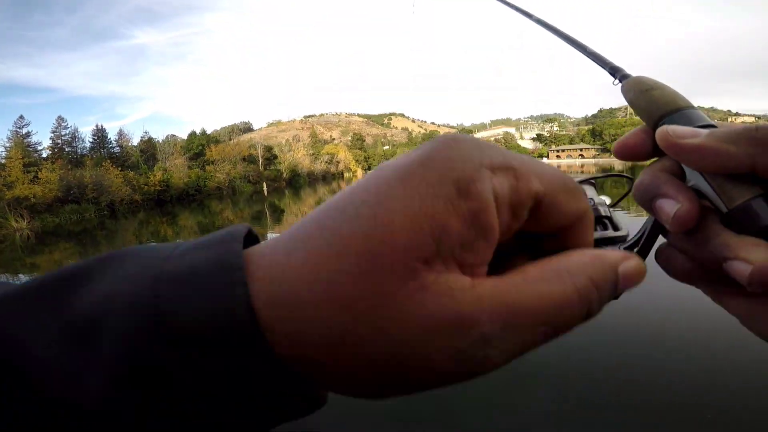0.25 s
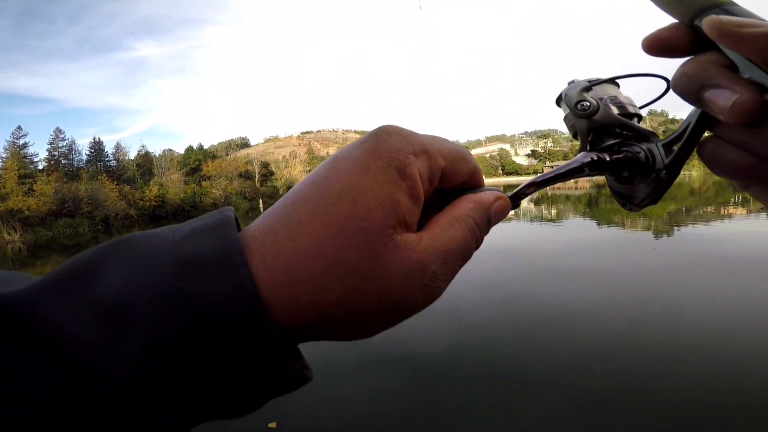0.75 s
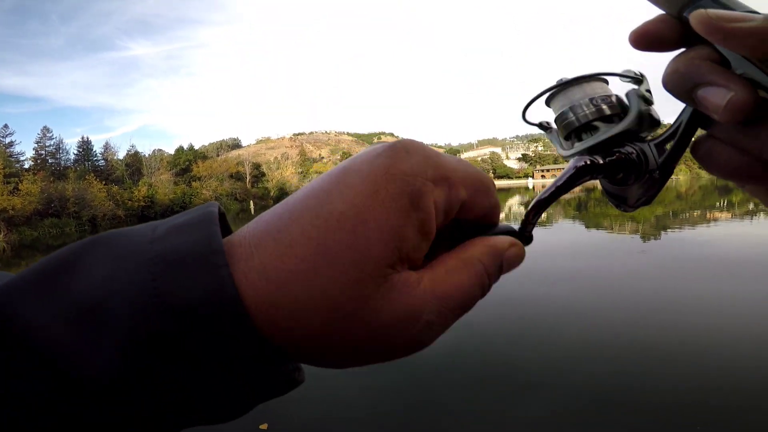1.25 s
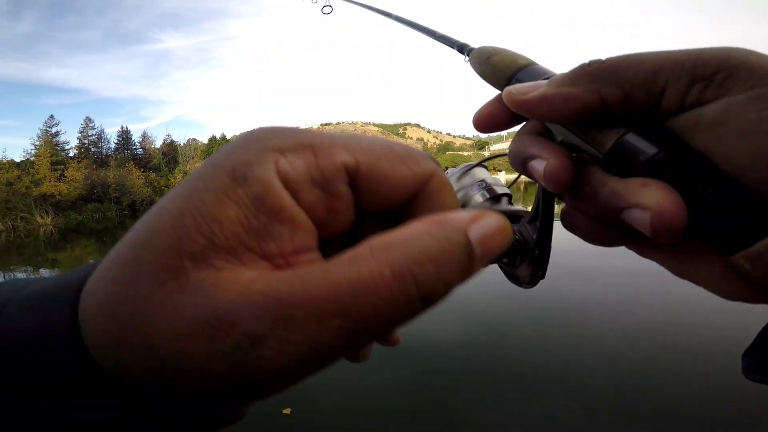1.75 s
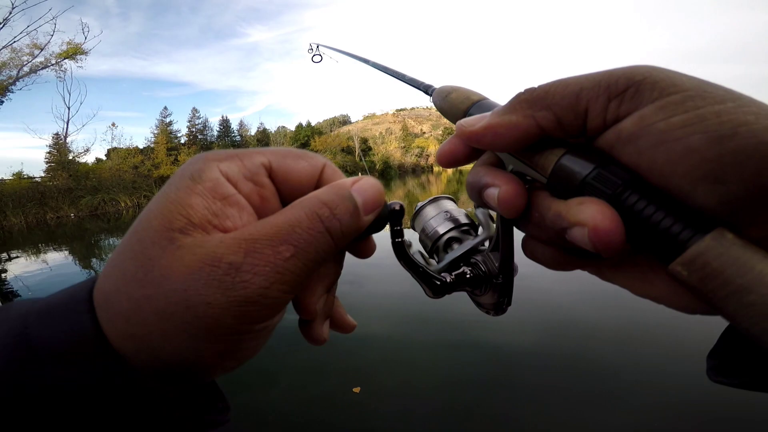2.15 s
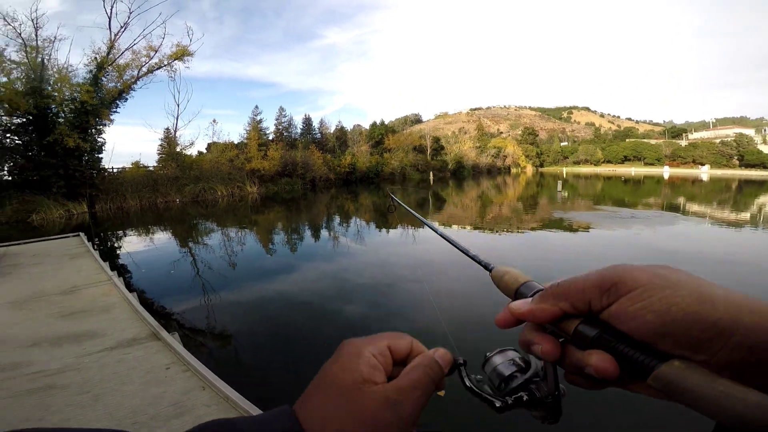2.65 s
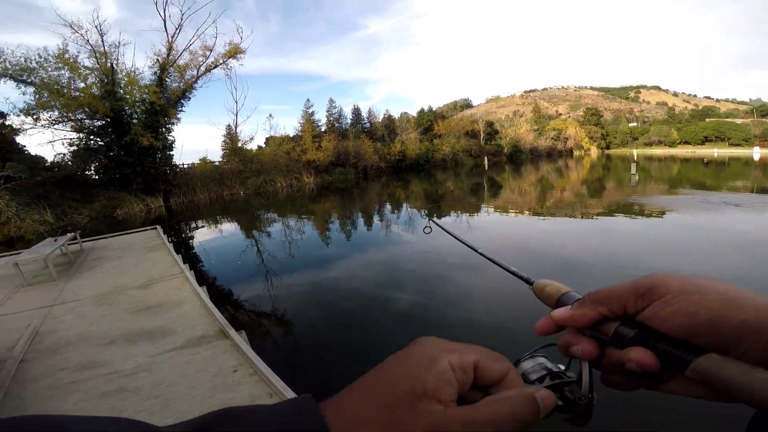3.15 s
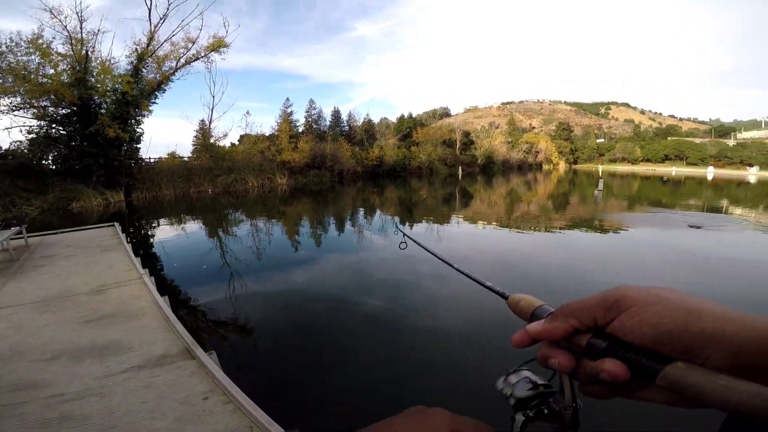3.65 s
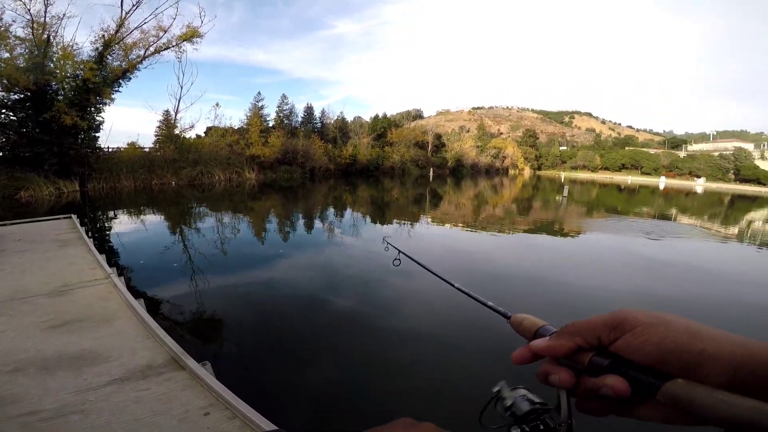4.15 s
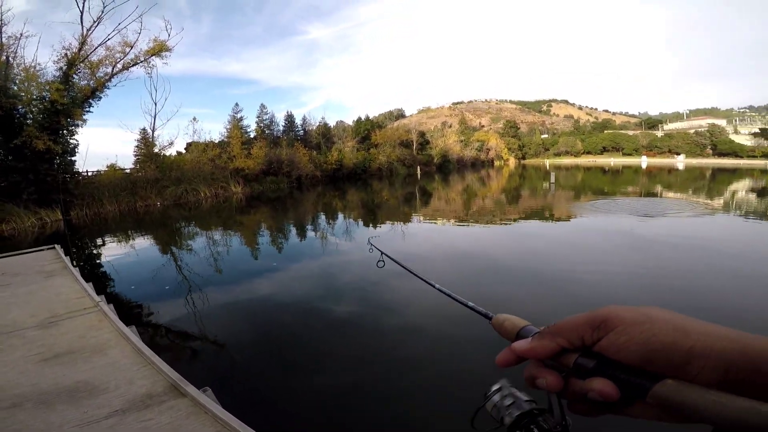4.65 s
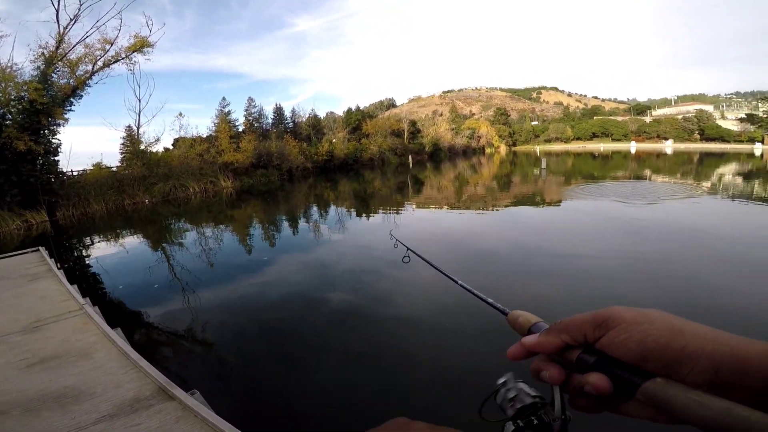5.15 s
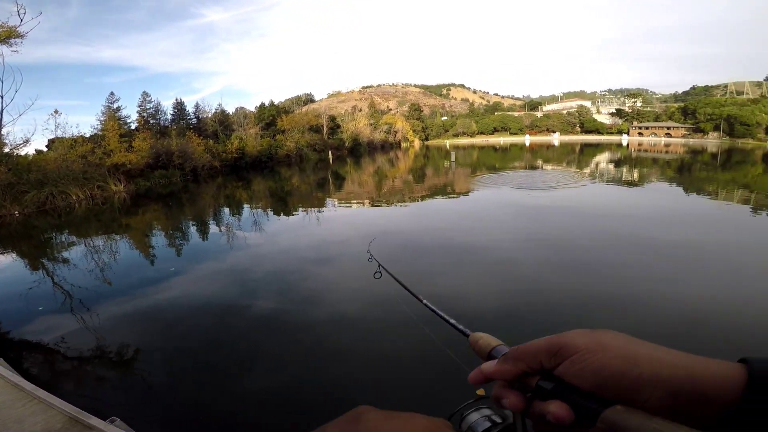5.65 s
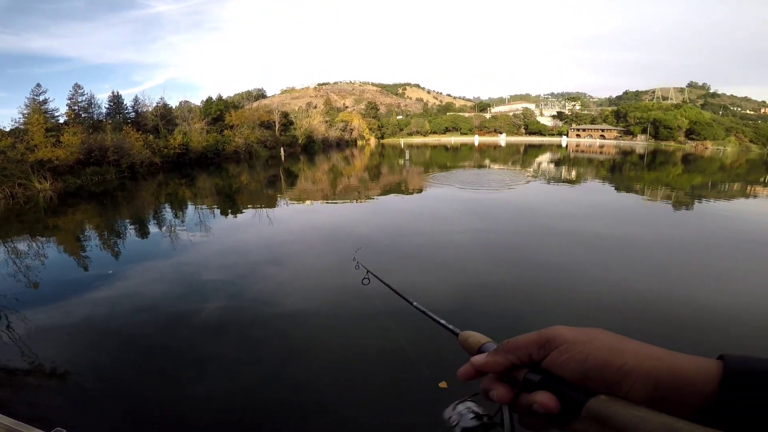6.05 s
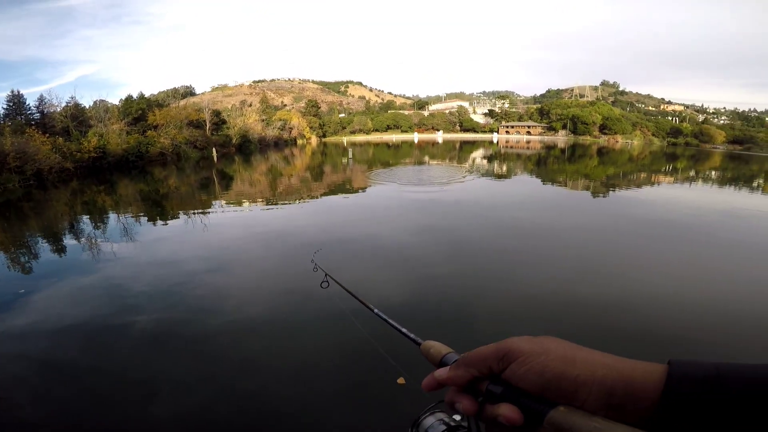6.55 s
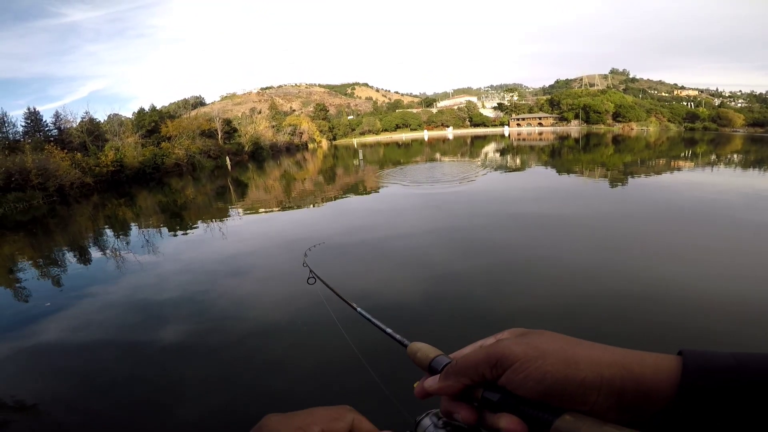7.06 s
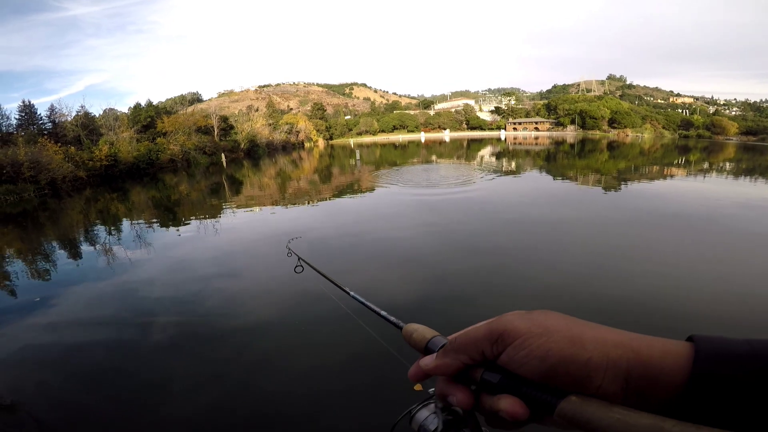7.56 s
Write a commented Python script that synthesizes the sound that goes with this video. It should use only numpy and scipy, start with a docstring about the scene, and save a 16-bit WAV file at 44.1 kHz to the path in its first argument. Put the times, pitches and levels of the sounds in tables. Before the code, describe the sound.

A deep, steady rumble of distant traffic fills the open lakeside throughout, with low engine drones slowly rising inside it. Close by, a fishing reel whirrs thinly and grittily under the hand. A light snap comes at 0.1 s and a tick near 0.5; cranking eases around 1 s, then sharp metallic ticks, brief line scrapes and cloth rubs crowd 1.15 to 1.95, with a dull knock at 1.85. Soft bumps follow at 2.35 and 2.6. From 3.0 to 3.25 knocks, snaps and rustles bunch together, then a fuller sleeve swish at 3.5. A tap comes at 3.8, muffled bumps around 4.5 and a tick at 4.9. Small swishes continue; the line scrapes at 6.45 and a thud with a snap lands at 6.8. One engine falls in pitch after 5.7 while another deep note climbs, swelling near 6.85 before fading. A very faint electronic whine lies underneath.

```python
"""A low rumble of road traffic comes across a still lake while, close by, a fishing reel whirrs and ticks.
A jacket sleeve swishes, the tackle knocks softly and three engines drone out of the far tyre roar.
Rubbing sounds are coloured noise that swells and flutters, knocks are short dying tones, and snaps and
ticks are clicks that ring a few pitches. Engines are stacks of sine waves. A body-worn stereo camera
hears it all: it presses down loud bass, adds a faint whine and cuts the very top."""
import sys
import numpy as np
from scipy import signal
from scipy.fft import rfft, irfft
from scipy.io import wavfile
from scipy.ndimage import uniform_filter1d

SR = 44100
rng = np.random.default_rng(int(sys.argv[2]) if len(sys.argv) > 2 else 0)


def unload_audio(sound):
    """Save the sound as a 16-bit wav file, at the path given as the first command line argument."""
    columns = np.transpose(np.atleast_2d(sound))
    # keep every value between -1 and 1, then stretch to whole-number steps
    steps = np.round(np.clip(columns, -1, 1) * 32767)
    wavfile.write(sys.argv[1], SR, steps.astype(np.int16))


N = 343980
TIME = np.arange(N) / SR
FREQS = np.maximum(np.fft.rfftfreq(N, 1 / SR), 1)


def from_db(db):
    """Turn decibels into a plain multiplier."""
    return 10 ** (np.asarray(db) / 20)


def rms_one(x):
    """Scale a signal to an average power of one."""
    return x / np.sqrt(np.mean(x ** 2) + 1e-20)


def in_time(rows):
    """Draw straight lines between the rows of a time table, giving each column at every sample."""
    s, *columns = np.transpose(rows)
    return [np.interp(TIME, s, c) for c in columns]


def in_frequency(rows):
    """Draw lines between the rows of a pitch table, giving each column at every frequency."""
    hz, *columns = np.transpose(rows)
    return [np.interp(np.log(FREQS), np.log(hz), c) for c in columns]


def drift(rate_hz):
    """Random wandering with a spread of 1 and about this many turns a second."""
    white = rfft(rng.standard_normal(N))
    return rms_one(irfft(white / (1 + (FREQS / rate_hz) ** 2), N))


def noise(spectrum):
    """Two unrelated noises of one colour and unit power, falling away steeply outside its range."""
    low_skirt = 1 / (1 + (spectrum[0][0] / FREQS) ** 4)
    high_skirt = 1 / (1 + (FREQS / spectrum[-1][0]) ** 8)
    colour = from_db(in_frequency(spectrum)[0]) * low_skirt * high_skirt
    white = rfft(rng.standard_normal((2, N)))
    return rms_one(irfft(white * colour, N))


def swells(strokes):
    """Add up the power of bell-shaped strokes, each at half its height at the ends of its length."""
    coarse = TIME[::SR // 1000]  # about a thousand points a second are enough
    power = 0
    for s, length, db in strokes:
        from_middle = 2 * (coarse - s) / length
        power = power + from_db(db) ** 2 * .5 ** (2 * from_middle ** 2)
    return np.interp(TIME, coarse, np.sqrt(power))


def stereo(pair, image):
    """Place a sound: row one is shared by both sides, row two is diffuse; the centre keeps its level."""
    balance_db, lead, alike = in_frequency(image)
    alike = np.clip(alike, 0, .995)
    shared, diffuse = rfft(pair) * np.sqrt([(1 + alike) / 2, (1 - alike) / 2])
    left = from_db(balance_db / 2) * np.exp(.5j * lead)
    centre = np.sqrt(abs(left) ** 2 + abs(left) ** -2 + 2 * alike * np.cos(lead)) / 2
    sides = np.array([(shared + diffuse) * left, (shared - diffuse) / left])
    return irfft(sides / centre, N)


def struck(events, modes, contact_s, soft_hz, focus_db, gritty):
    """Each contact, a click plus a gritty burst, rings modes that weaken by focus_db per octave off its pitch."""
    burst = np.exp(-TIME[:SR // 50] / contact_s)
    grains = rng.standard_normal((len(events), 2, len(burst)))
    contacts = gritty * grains * burst / np.linalg.norm(burst)
    contacts[:, 0, 0] += np.sqrt(1 - gritty ** 2)
    ringing = 0
    for k, (hz, mode_db, t60) in enumerate(modes):
        force = np.full((2, N), 1e-18)
        for (s, strength_db, favoured_hz), contact in zip(events, contacts):
            start = round(s * SR)
            db = strength_db - focus_db * abs(np.log2(hz / favoured_hz))
            force[:, start:start + len(burst)] += from_db(db) * contact
        decay = from_db(-60 / (t60 * SR))
        w = 2 * np.pi * hz / SR
        top = [0, from_db(mode_db) * np.sin(w)]
        bottom = [1, -2 * decay * np.cos(w), decay * decay]
        ringing = ringing + (-1) ** k * signal.lfilter(top, bottom, force)  # modes alternate in sign
    return signal.sosfilt(signal.butter(2, soft_hz, fs=SR, output="sos"), ringing)


# how hard the reel is cranked, before trims: start_s, treble_db, upper_middle_db
CRANKING = [(0.0, -57, -59.5), (0.47, -56, -60.5), (0.54, -60.5, -63), (0.85, -60.5, -66), (1.14, -61, -64),
            (1.18, -60, -58), (1.3, -58, -60), (1.42, -55.5, -57), (1.85, -57.5, -56), (2.2, -58.5, -58),
            (2.71, -58.5, -60.5), (3.71, -58, -60), (4.04, -59, -62), (5.56, -59, -62),
            (5.95, -57.5, -59.5), (6.12, -59, -62.5), (7.8, -59.5, -60)]
# colour of the gears' whirr: pitch_hz, relative level_db (per Hz)
WHIRR_COLOUR = [(2000, -31.5), (4000, -8), (5000, -8), (6200, -3), (7600, -4), (9500, -8.5), (11500, -14),
                (13000, -13.5), (14500, -36)]
# colour of the rotor's rasp: pitch_hz, relative level_db (per Hz)
RASP_COLOUR = [(500, -11), (1200, 5.5), (1900, 2), (2800, -0.5), (3800, -4.5), (5000, -11.5), (8000, -34)]
# where the gears and the line sit: pitch_hz, left_minus_right_db, left_lead_radians, alike_0_to_1
AHEAD_IMAGE = [(1000, 0, 1.7, 0.57), (1980, 0.87, 1.86, 0.33), (3600, -.5, 0.67, 1), (5000, 0, 0.53, 0.2),
               (8000, 0, 0.54, 0.083)]
WHIRR_TRIM_DB, RASP_TRIM_DB = -1.5, 4.5


def gears(grit_per_s=45, grit_db=27.0):
    """Fine rubbing in the reel flutters as the teeth mesh, with tiny clicks where they catch."""
    treble_db, middle_db = in_time(CRANKING)
    teeth = from_db(0.9 * drift(63))
    whirr = noise(WHIRR_COLOUR) * from_db(treble_db + WHIRR_TRIM_DB)
    rasp = noise(RASP_COLOUR) * from_db(middle_db + RASP_TRIM_DB)
    catches = rng.random(N) < grit_per_s / SR
    clicks = catches * rng.standard_normal((2, N)) * from_db(middle_db + grit_db)
    click_band = signal.butter(2, [1500, 4500], "band", fs=SR, output="sos")
    grit = signal.sosfilt(click_band, clicks + 1e-18)
    return stereo(teeth * (whirr + rasp) + grit, AHEAD_IMAGE)


# the loose parts at full effort: chances per second, middle level and its random spread
RATTLES_PER_S, RATTLE_DB, RATTLE_SPREAD_DB = 65, -45.5, 5


def rattles(low_hz=2200, high_hz=8500):
    """Loose parts touch by chance, more often and louder with harder cranking; lists them like the ticks."""
    middle_db = in_time(CRANKING)[1]
    effort_db = middle_db - middle_db.max()
    chance = RATTLES_PER_S * from_db(2 * effort_db) ** 2 / SR
    happens = rng.random(N) < chance
    db = RATTLE_DB + effort_db + RATTLE_SPREAD_DB * rng.standard_normal(N)
    hz = low_hz * (high_hz / low_hz) ** rng.random(N)
    moments = np.flatnonzero(happens[:-SR // 20])  # none in the last twentieth of a second
    return [(TIME[i], db[i], hz[i]) for i in moments]


# metal ticks of the reel: start_s, strength_db, favoured pitch_hz
METAL_TICKS = [(.48, -34, 5400), (1.1564, -27, 5800), (1.159, -30, 5700), (1.192, -41, 8000),
               (1.222, -34, 3900), (1.225, -32, 7300), (1.229, -34, 6200), (1.3405, -24, 6500),
               (1.412, -34, 7800), (1.4175, -35, 4000), (1.453, -32, 4500), (1.506, -28, 6500),
               (1.523, -30, 8500), (1.526, -33, 3600), (1.5753, -37, 7500), (1.582, -33, 6900),
               (1.6251, -34, 2700), (1.838, -35, 6000), (1.898, -29, 6500), (1.927, -26, 2400),
               (2.6857, -32, 8500), (2.9435, -32, 6900), (3.161, -30, 5200), (3.5393, -32, 6200),
               (3.543, -30, 8000), (3.8161, -33, 5500), (4.02, -33, 4600), (4.9352, -27, 6700),
               (6.4636, -28, 3800)]
# pitches its metal rings: pitch_hz, level_db, t60_s (time to fall by 60 dB)
METAL_MODES = [(2700, -13, .003), (3560, -2.5, 0.0031), (4640, -10.5, 0.0039), (5730, -3.5, 0.003),
               (6150, -5.5, 0.0065), (7250, -7, 0.0035), (8550, -11, 0.0039), (9700, -12, 0.0017)]


def ticks():
    """Ticks and rattles ring the small metal parts of the reel for a few thousandths of a second."""
    metal = struck(METAL_TICKS + rattles(), METAL_MODES,
                   contact_s=0.0015, soft_hz=14000, focus_db=13.5, gritty=0.76)
    # image columns: pitch_hz, left_minus_right_db, left_lead_radians, alike_0_to_1
    return stereo(metal, [(3000, 1, 0.021, 0.91), (7000, 3.4, 0.35, 0.28)])


# the line drags over its roller: middle_s, length_s, level_db
LINE_DRAGS = [(1.178, .025, -58), (1.22, .03, -52), (1.52, 0.024, -53), (6.45, 0.09, -53)]
# colour of that scrape: pitch_hz, relative level_db (per Hz)
SCRAPE_COLOUR = [(1800, 5), (2700, 1.5), (3700, -2.5), (5000, -12), (7000, -7), (10000, -31)]


def line(rough_db=5.0):
    """The line scrapes in brief drags, made rough by a fast random flutter."""
    roughness = from_db(rough_db * drift(200))
    return stereo(noise(SCRAPE_COLOUR) * swells(LINE_DRAGS) * roughness, AHEAD_IMAGE)


# sleeve strokes: middle_s, length_s, level_db, extra_lows_db, extra_hiss_db
SLEEVE_STROKES = [(1.369, 0.016, -47.5, -3, 6), (1.541, 0.027, -45, -6, -4), (1.579, 0.014, -40.5, -3, 2),
                  (1.648, 0.043, -38.5, 8.5, -1.5), (1.756, 0.021, -44, -6, -2), (1.846, 0.05, -47, 5, 1),
                  (2.064, 0.04, -43.5, 4.5, 6), (2.33, 0.028, -49.5, 2, -6), (2.954, 0.046, -48, 9, 5),
                  (3.04, 0.12, -54, 5, -3), (3.161, .05, -48.5, 7, 3), (3.22, 0.12, -48.5, 4, 3.5),
                  (3.281, 0.048, -41.5, 7, -5), (3.483, 0.083, -37.5, 6, 1), (3.61, 0.031, -47.5, -3, -5),
                  (3.863, 0.042, -46.5, -6.5, 7.5), (4.728, 0.069, -48.5, 3, 7),
                  (4.981, 0.08, -45.5, -0.5, 3.5), (5.07, 0.066, -48.5, 2, 3), (5.219, 0.054, -45, -2, 3),
                  (5.422, 0.045, -53.5, -3, -2), (5.624, .028, -50.5, 14.5, 7),
                  (5.719, 0.044, -51.5, 4, -3), (5.818, 0.05, -46.5, 5.5, 0), (5.888, 0.023, -44.5, -2, 2),
                  (6.032, 0.11, -49, 6, 5), (6.302, 0.054, -47.5, 9.5, 4), (6.962, .045, -48, 5, 6.5),
                  (7.016, .04, -51, -4, -1), (7.13, 0.04, -40, 0.5, 3), (7.238, 0.037, -55.5, 4, 1),
                  (7.376, 0.068, -45, 3, 5.5), (7.57, 0.051, -50, 0, 1), (7.652, 0.086, -59, -2, -1)]
# colour of the cloth: pitch_hz, relative level_db (per Hz)
CLOTH_COLOUR = [(150, 0), (300, 2), (600, -1), (1000, -.5), (1500, 4), (1950, 1), (2400, -13),
                (3600, -13.5), (5000, -21.5), (7500, -17.5), (10000, -24), (14000, -40)]
# where sleeve and grip sit: pitch_hz, left_minus_right_db, left_lead_radians, alike_0_to_1
NEAR_IMAGE = [(250, -14, 1.2, .35), (510, -1.5, 2.95, 0.99), (1010, 2, 3.06, 0.97), (1800, 0.5, 2.38, 0.9),
              (2330, 0.5, 2.8, 0.94), (2980, 1, 0.57, 0.47), (8000, -11.5, .4, .11)]
# between strokes the cloth stirs faintly at random
STIR_DB, STIR_SWING_DB, STIRS_PER_S = -61, 4, 9.1


def sleeve(grain_db=2.0, catch_db=0.6, weight_hz=1000, hiss_hz=4500):
    """Cloth slides and its weave catches; pressed strokes are fuller, light ones hiss, cranking stirs it."""
    effort_db = in_time(CRANKING)[1]
    stir_db = STIR_DB + effort_db - effort_db.mean() + STIR_SWING_DB * drift(STIRS_PER_S)
    stir = from_db(stir_db)
    weave = from_db(grain_db * drift(300) + catch_db * drift(45))
    cloth = noise(CLOTH_COLOUR) * weave
    low = signal.sosfiltfilt(signal.butter(2, weight_hz, fs=SR, output="sos"), cloth)
    high = signal.sosfiltfilt(signal.butter(2, hiss_hz, "high", fs=SR, output="sos"), cloth)
    middle = cloth - low - high
    s, length, db, lows_db, hiss_db = np.transpose(SLEEVE_STROKES)
    swish = 0
    for part, level_db in [(low, db + lows_db), (middle, db), (high, db + hiss_db)]:
        strokes = swells(zip(s, length, level_db))
        swish = swish + part * np.hypot(strokes, stir)
    return stereo(swish, NEAR_IMAGE)


# dull knocks of hand and tackle: start_s, strength_db, pitch_hz, cycles until 60 dB down
DULL_KNOCKS = [(1.66, -17, 383, 6.3), (1.694, -17.5, 422, 11), (1.8534, -8, 477, 3.9),
               (2.336, -23, 600, 3.9), (2.352, -18.5, 626, 2.1), (2.366, -22, 472, 6.1),
               (2.3854, -16, 494, 5), (2.622, -21, 530, 9.8), (2.631, -19.5, 527, 15),
               (3.0936, -10.5, 450, 6), (3.149, -15, 357, 4), (3.162, -18.5, 620, 6.6),
               (3.1677, -10, 700, 4.2), (3.2014, -11.5, 500, 3.4), (3.214, -14.5, 442, 10),
               (3.229, -22.5, 430, 14), (3.8156, -14, 614, 4.7), (4.452, -23, 710, 3.3),
               (4.514, -20, 456, 12), (4.529, -13.5, 454, 9), (4.541, -25, 480, 10), (4.553, -23, 450, 10),
               (4.5707, -15.5, 470, 8.8), (4.7555, -22, 720, 3.4), (6.7947, -18, 620, 4.4),
               (6.8091, -10, 537, 2.7)]
# where the knocks sit: pitch_hz, left_minus_right_db, left_lead_radians, alike_0_to_1
HELD_IMAGE = [(250, -15, 0.3, 1), (510, -8, 1.9, 0.51), (1000, -1, 2.46, 0.86)]
REBOUND_LOSS_DB = 15.5


def knocks(rise_share=0.075, scuff_db=-26.0, scuff_t60=0.059, soft_hz=950):
    """A damped thud and one rebound, each with a short scuff; more cycles also mean a slower rise."""
    thud, scuff = np.zeros(N), np.zeros(N)
    rebounds = []
    for s, db, hz, cycles in DULL_KNOCKS:
        gap_s = 0.023 * rng.uniform(0.76, 0.9)
        rebounds.append((s + gap_s, db - REBOUND_LOSS_DB, hz, cycles))
    for s, db, hz, cycles in DULL_KNOCKS + rebounds:
        start = round(s * SR)
        age = TIME[:min(SR // 4, N - start)]
        spent = age * hz / cycles  # share of its life used up
        rise = 1 - np.exp(-spent / rise_share)
        tone = np.sin(2 * np.pi * hz * age)
        thud[start:start + len(age)] += 2 * rise * from_db(db - 60 * spent) * tone
        scuff[start:start + len(age)] += from_db(db - 60 * age / scuff_t60)
    soften = signal.butter(2, soft_hz, fs=SR, output="sos")
    thud, scuff = signal.sosfilt(soften, np.array([thud, scuff]) + 1e-18)
    surfaces = noise([(200, 5.0), (450, -3.0), (750, 3.0), (1500, -21.0)])  # pitch_hz, level_db
    rub = surfaces * scuff * from_db(scuff_db)
    return stereo(thud * [[1], [0]] + rub, HELD_IMAGE)


# sharp plastic snaps of the grip: start_s, strength_db, favoured pitch_hz
GRIP_SNAPS = [(.1, -27, 1900), (.51, -32, 1200), (.895, -37, 680), (1.4215, -22.5, 1100),
              (2.352, -25, 2100), (3.018, -29.5, 1000), (3.160, -28, 3600), (3.168, -18.5, 1000),
              (3.202, -24.5, 3200), (3.8165, -24.5, 2500), (6.7945, -25, 2800)]
# pitches the grip rings: pitch_hz, level_db, t60_s (time to fall by 60 dB)
GRIP_MODES = [(650, -1, .008), (1000, 0, .007), (1550, 1, .007), (2100, -5, .004), (2600, -4, .007),
              (4100, -18, .003), (5800, -12, .003)]


def snaps():
    """Sharp contacts ring the plastic grip very briefly."""
    plastic = struck(GRIP_SNAPS, GRIP_MODES, contact_s=0.0019, soft_hz=5300, focus_db=6.0, gritty=0.62)
    return stereo(plastic, NEAR_IMAGE)


# rumble of the camera's case: pitch_hz, relative level_db (per Hz)
CASE_COLOUR = [(45, -11), (100, 16.5), (150, -2), (220, -1), (330, -2), (600, -19)]
# length of each shake, and its level against the knock
SHAKE_S, SHAKE_DB = 0.085, -13.5


def case():
    """Every knock shakes the camera, whose case rumbles separately in each microphone."""
    shakes = swells([(s, SHAKE_S, db + SHAKE_DB) for s, db, *_ in DULL_KNOCKS])
    return noise(CASE_COLOUR) * shakes * from_db(3.9 * drift(40))


# road roar: pitch_hz, relative level_db (per Hz)
ROAD_COLOUR = [(12, -20), (20, -4.5), (32, 1.5), (58, 4), (85, -4), (110, -1), (140, -7.5), (175, -12),
               (230, -12.5), (300, -18.5), (450, -25), (570, -33), (800, -34), (1100, -38), (1400, -50.5),
               (3000, -60.5)]
# where far sounds sit: pitch_hz, left_minus_right_db, left_lead_radians, alike_0_to_1
FAR_IMAGE = [(45, -1.3, -0.14, .985), (90, -2.4, -0.13, .95), (150, -3.8, -0.03, 0.8),
             (250, -6.3, 0.1, 0.66), (427, -10.5, 1.5, 0.37), (700, -12, 2.5, 0.07), (1190, 4.5, 2.5, 0.23),
             (2240, 10.5, 3, 0.2), (3760, -3, -1, .5)]
# the roar is steady, with a slight random heave
ROAD_DB, HEAVE_DB, HEAVES_PER_S = -17.5, 0.8, 3.1


def traffic():
    """Tyre roar is deep noise, with three engines droning in it."""
    roar = noise(ROAD_COLOUR) * from_db(ROAD_DB + HEAVE_DB * drift(HEAVES_PER_S))
    soft_ends = signal.windows.tukey(N, .005)
    drone = (lorry() + van() + car()) * soft_ends
    return stereo(roar + drone * [[1], [0]], FAR_IMAGE)


# the engines' pitch wanders a little, and their tones fade in and out
ENGINE_WANDER_HZ, FADES_PER_S = .05, 1.0


def engine(rate_hz, orders, fading_db):
    """Exhaust tones at multiples of one rate; each fades on its own on the long way over the water."""
    turn = 2 * np.pi * np.cumsum(rate_hz + ENGINE_WANDER_HZ * drift(1.73)) / SR
    drone = 0
    for multiple, db in orders:
        level = np.sqrt(2) * from_db(db + fading_db * drift(FADES_PER_S))
        drone = drone + level * np.sin(multiple * turn + 2 * np.pi * rng.random())
    return drone


# the lorry's steady tones: multiple of the firing rate, level_db against LORRY_DB
LORRY_TONES = [(1, 2), (2, 0), (3, -5.5), (4, -16.5)]
# tones that boom for a while as the revs climb: multiple, loudest_s, length_s, level_db
LORRY_BOOMS = [(2, 0.85, 0.51, -28), (3, 0.88, 1.8, -28.5), (5, 1.07, 2.1, -39.5), (4, 2.35, 0.46, -39),
               (4, 4.2, 0.9, -41), (2, 6.24, 0.97, -23.5), (4, 5.99, 1.09, -30), (3, 5.3, 1.14, -34),
               (3, 7.28, 1.9, -32.5), (1, 5.73, 1.25, -22.5)]
# firing rate at the start, its even climb, and level
LORRY_HZ, LORRY_GAIN_HZ_PER_S, LORRY_DB = 60.14, .8, -30.5


def lorry():
    """The revs climb evenly, and single tones boom in passing."""
    power = {round(k): from_db(LORRY_DB + db) ** 2 for k, db in LORRY_TONES}
    for k, *boom in LORRY_BOOMS:
        power[round(k)] = power.get(round(k), 0) + swells([boom]) ** 2
    orders = [(k, 10 * np.log10(p + 1e-12)) for k, p in power.items()]
    return engine(LORRY_HZ + LORRY_GAIN_HZ_PER_S * TIME, orders, fading_db=0.6)


# a van revs up slowly, then lets off: start_s, crankshaft_hz, third_multiple_db, fifth_multiple_db
VAN_REVS = [(0, 29.64, -45, -33), (1.8, 30.56, -24, -32.5), (2.4, 30.92, -47, -27),
            (2.85, 30.95, -23.5, -36), (3.4, 31.35, -29, -34), (4.3, 31.95, -26, -29),
            (5.3, 33.14, -27.5, -36), (5.7, 32.38, -23.5, -32.5), (6.15, 28.37, -22, -26),
            (6.7, 24.88, -42, -51)]


def van():
    """Two tones of one exhaust rise and fall in pitch together."""
    crank_hz, third_db, fifth_db = in_time(VAN_REVS)
    return engine(crank_hz, [(3, third_db), (5, fifth_db)], fading_db=2.0)


# a car pulls away: loudest moment, length, level and firing rate there, and how fast that climbs
CAR_S, CAR_LENGTH_S, CAR_DB, CAR_HZ, CAR_GAIN_HZ_PER_S = 6.85, 1.52, -16.5, 69.53, 8.5


def car():
    """One deep note climbs as it swells and fades."""
    firing_hz = CAR_HZ + CAR_GAIN_HZ_PER_S * (TIME - CAR_S)
    note = engine(firing_hz, [(1, 0)], fading_db=1.8)
    return note * swells([(CAR_S, CAR_LENGTH_S, CAR_DB)])


def scene():
    """The small sounds of the angler in front of the far traffic."""
    reel = gears() + ticks() + line()
    handling = sleeve() + knocks() + snaps() + case()
    return reel + handling + traffic()


# faint electronic whine: pitch_hz, level_db
WHINE_TONES = [(6294, -78), (6324, -79), (8500, -88), (12617, -88)]
CUTOFF_HZ = 14300


def record(dry, threshold_db=-19.0, squeeze=0.32, window_s=0.017):
    """The camera turns down loud bass, adds its faint whine and cuts the top."""
    bass = signal.sosfiltfilt(signal.butter(2, 220, fs=SR, output="sos"), dry)
    bass_power = uniform_filter1d(np.mean(bass ** 2, axis=0), int(window_s * SR))
    bass_db = 10 * np.log10(bass_power + 1e-12)
    gain = from_db(-squeeze * np.maximum(bass_db - threshold_db, 0))
    whine = 0
    for hz, db in WHINE_TONES:
        whine = whine + np.sqrt(2) * from_db(db + drift(2)) * np.sin(2 * np.pi * hz * TIME)
    top_cut = signal.ellip(10, .1, 80, CUTOFF_HZ, fs=SR, output="sos")
    return signal.sosfilt(top_cut, dry + (gain - 1) * bass + whine)


dry = scene()
out = record(dry)
unload_audio(out)
```